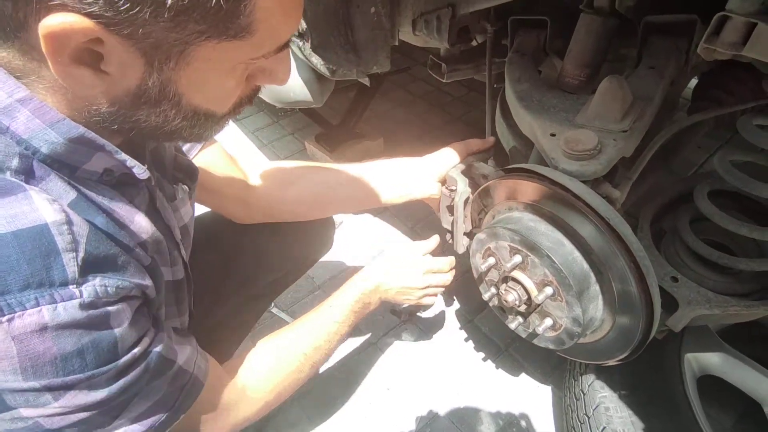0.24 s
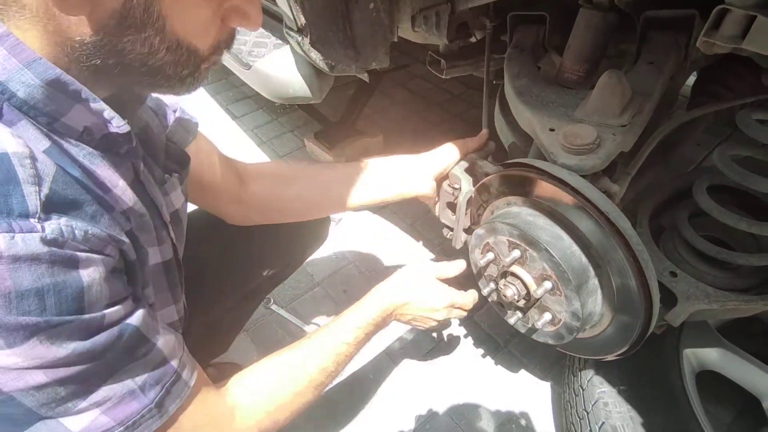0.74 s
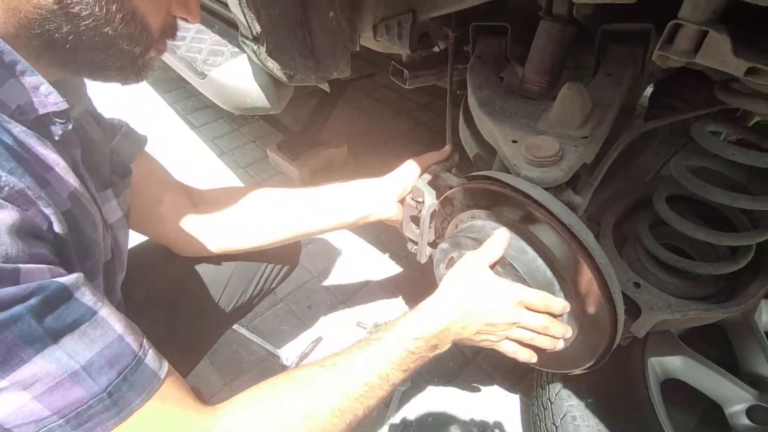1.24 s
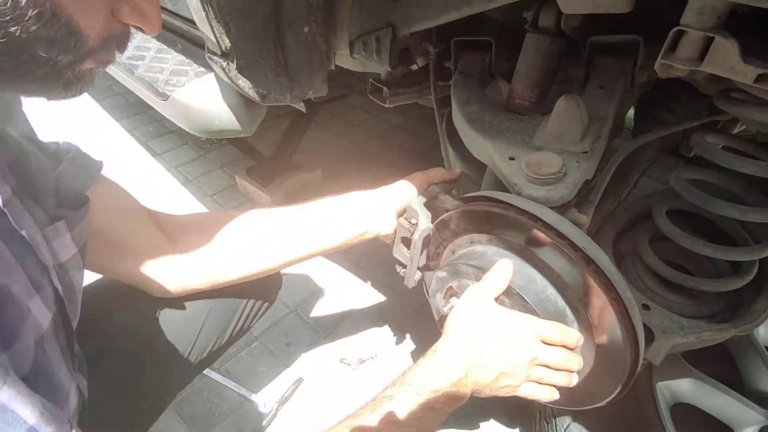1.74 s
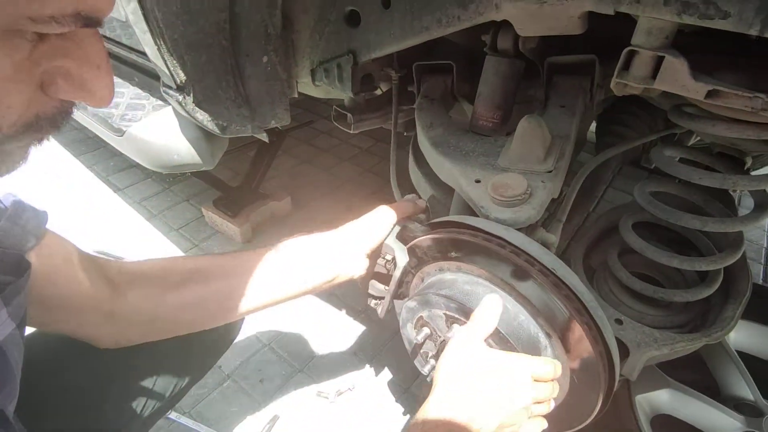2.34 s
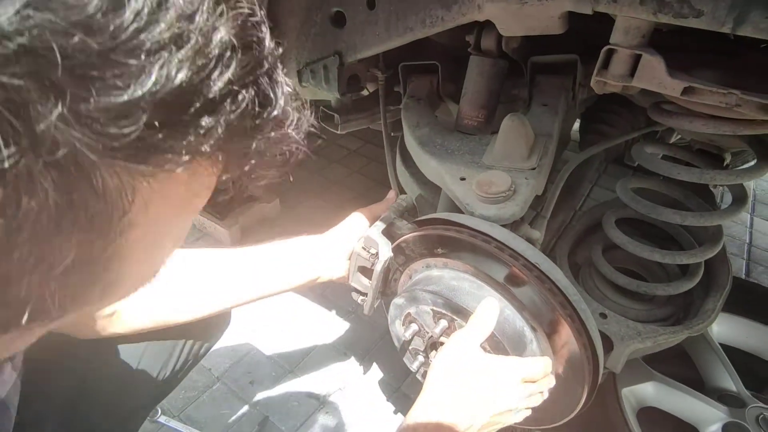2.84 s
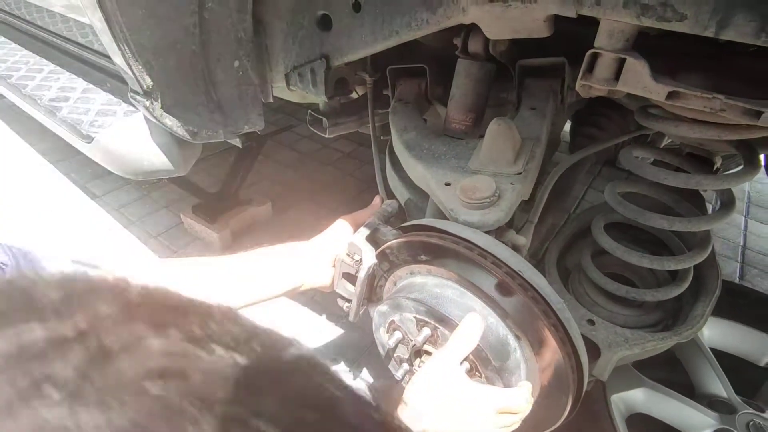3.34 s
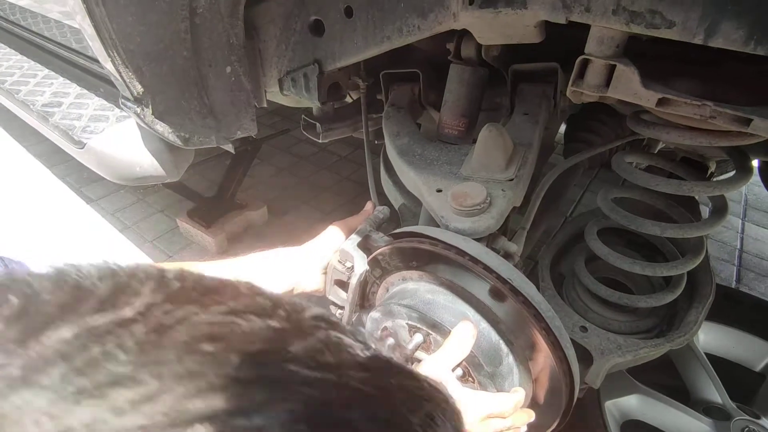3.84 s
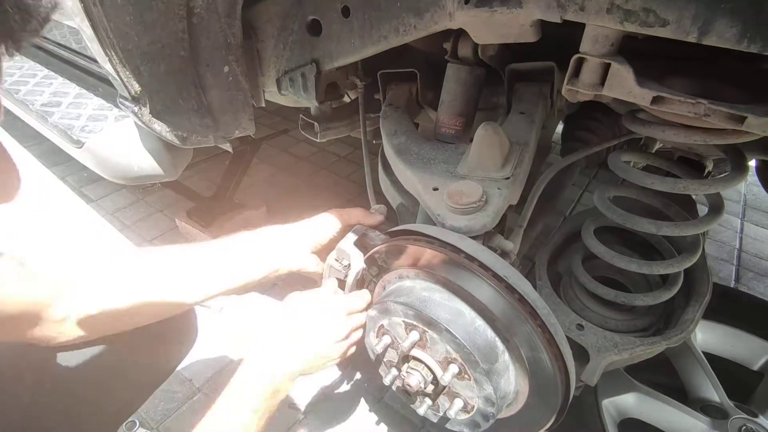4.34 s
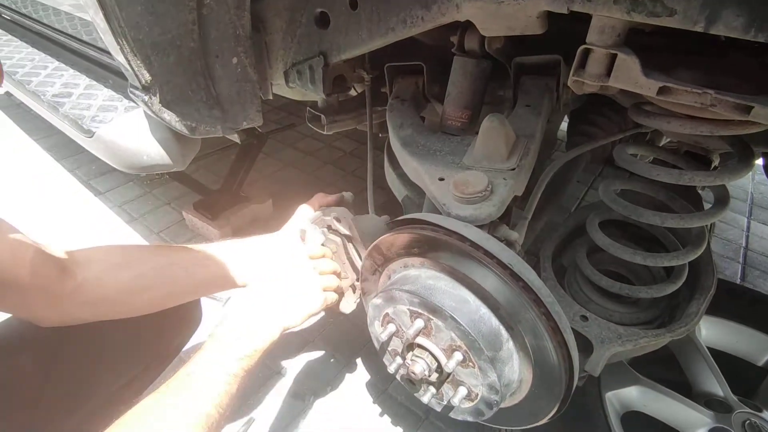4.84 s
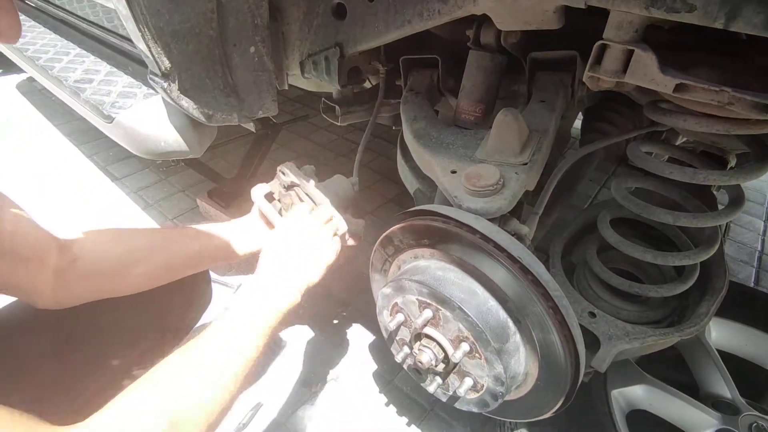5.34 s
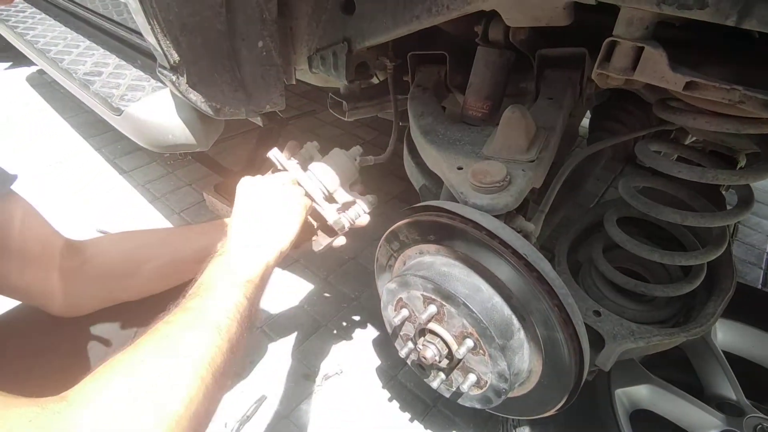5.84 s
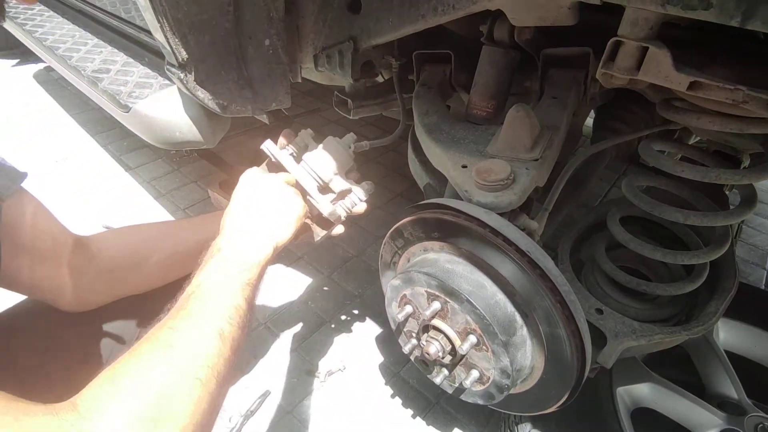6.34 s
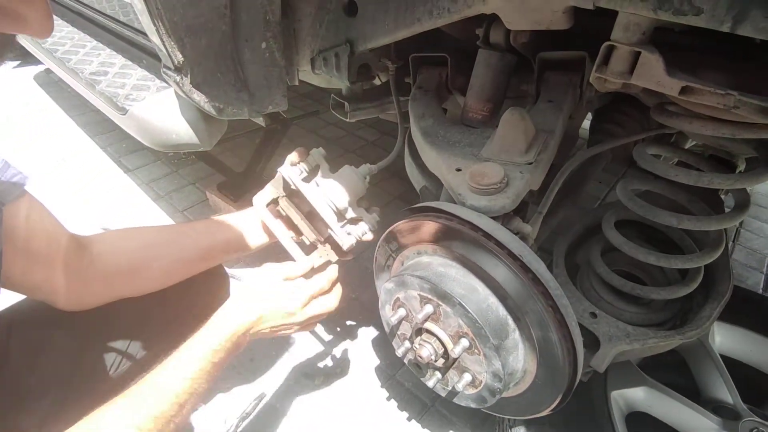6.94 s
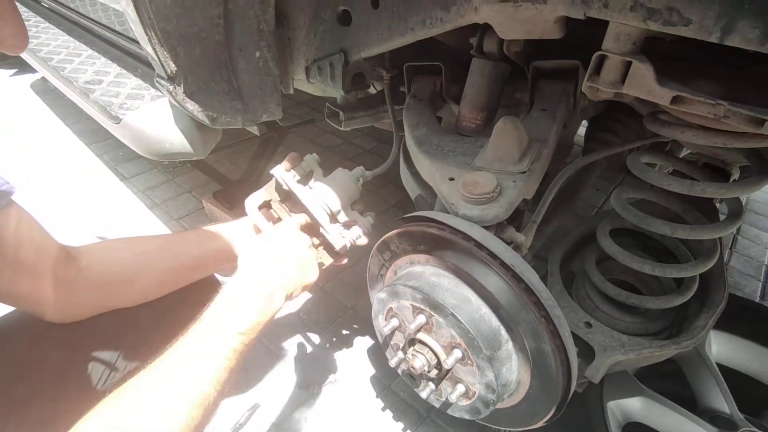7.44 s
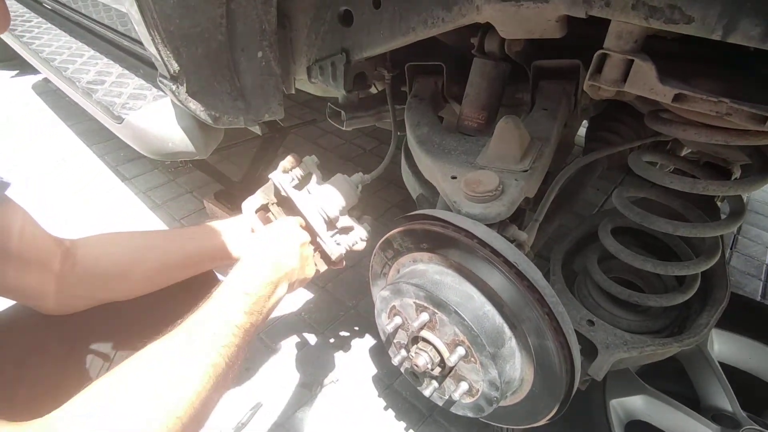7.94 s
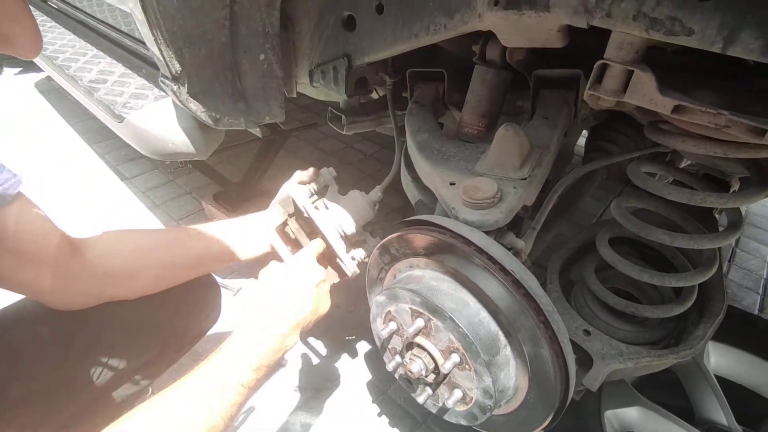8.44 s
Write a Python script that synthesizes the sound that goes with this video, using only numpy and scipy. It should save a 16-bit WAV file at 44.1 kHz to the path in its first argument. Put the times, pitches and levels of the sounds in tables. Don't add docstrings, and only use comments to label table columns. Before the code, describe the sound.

A loose brake caliper knocks and rattles against its iron disc, then is pulled off and lightly picked at, while wind buffets the microphone outdoors.

```python
import sys
import numpy as np
from scipy import signal
from scipy.fft import rfft, irfft, next_fast_len
from scipy.io import wavfile
from scipy.ndimage import uniform_filter1d, map_coordinates

SR = 44100
rng = np.random.default_rng(int(sys.argv[2]) if len(sys.argv) > 2 else 0)


def volts_from_db(level):
    exponent = np.asarray(level, float) / 20
    return 10 ** exponent


def transcribe(u):
    v = np.clip(np.atleast_2d(u).T, -1, 1)
    q = np.round(v * 32767).astype(np.int16)
    wavfile.write(sys.argv[1], SR, q)


N = 383714

STRONG_DB = -30


def unit(x):
    return x / np.sqrt(np.mean(x ** 2, axis=-1, keepdims=True) + 1e-20)


def curves(rows):
    s, *cols = np.transpose(rows)
    return [np.interp(np.arange(N) / SR, s, c) for c in cols]


def wobble(rate):
    knots = rng.standard_normal((2, int(N * rate / SR) + 4))
    return np.array([map_coordinates(k, [np.arange(N) * rate / SR]) for k in knots])


def along(points, hz):
    f, v = np.transpose(points)
    return np.interp(np.log(hz + 1), np.log(f), v)


def coloured(x, spectrum):
    m = 8192
    level_db = along(spectrum, np.fft.rfftfreq(m, 1 / SR))
    cepstrum = irfft(np.log(volts_from_db(level_db) + 1e-6), m)
    cepstrum[1:m // 2] *= 2
    cepstrum[m // 2 + 1:] = 0
    response = irfft(np.exp(rfft(cepstrum)), m)[:m // 2] * np.hanning(m)[m // 2:]
    return signal.fftconvolve(x, response[None] / np.linalg.norm(response), axes=1)[:, :N]


def noise(alike):
    a, b = rng.standard_normal((2, 2, N))
    share = np.clip(alike, 0, 1)
    return np.sqrt(share) * a[0] + np.sqrt(1 - share) * b


def brake():
    # Hz, level in dB per Hz
    thud_colour = [(110, -27), (200, 0.5), (500, -0.5), (900, -7), (1200, -10.5), (2000, -60.5),
                   (4000, -120)]
    clack_colour = [(700, -34.5), (1200, -8), (1600, -0.5), (2400, -6.5), (2800, -11), (4200, -25),
                    (8000, -120)]
    fizz_colour = [(2000, -19.5), (3500, -8.5), (5500, -6.5), (7000, -2.5), (8500, -5), (9800, -18),
                   (13500, -28.5), (15500, -45.5)]
    swish_colour = [(1800, -16), (3200, -11), (5000, -9.5), (7000, -2), (8500, -8), (9800, -22.5),
                    (13500, -29.5), (15500, -54.5)]
    # Hz, level in dB, t60 in seconds
    held_disc = [(502, -1.5, 0.24), (629, -7, 0.08), (728, -14, 0.24), (927, -3.5, 0.11), (984.6, -6, 0.32),
                 (1550, -9.5, 0.078), (1934, -8, 0.11)]
    # Hz, left minus right in dB
    left_lean = [(60, 11.5), (180, 7), (550, 4), (1650, 5), (4970, -3.5), (15000, 4)]

    thud, clack, fizz, ring = part_contacts()
    rub_fizz, rub_grind = strokes()
    grain = unit(volts_from_db(2.2 * wobble(150) + 1.3 * wobble(45)[0] + 1.1 * wobble(12)[0]))
    grind = rub_grind * grain
    thud = thud + volts_from_db(-3.0) * grind * noise(1.0)
    clack = clack + volts_from_db(-8.0) * grind * noise(0.14)
    swish = rub_fizz * grain * noise(0.11)

    hum = ringing(held_disc)
    hum = hum / np.linalg.norm(hum[0])
    ring = ring + volts_from_db(-5) * signal.fftconvolve(grind * noise(0.28), hum, axes=1)[:, :N]

    mix = coloured(thud, thud_colour) + coloured(clack, clack_colour)
    mix = mix + coloured(fizz, fizz_colour) + coloured(swish, swish_colour)
    m = next_fast_len(N)
    lean = volts_from_db(along(left_lean, np.fft.rfftfreq(m, 1 / SR)) * [[.5], [-.5]])
    return irfft(rfft(mix + ring + long_rings(), m) * lean, m)[:, :N]


def part_contacts():
    # time in seconds, peak in dB, then thud, fizz and ring
    # in dB re peak
    nudges = [(0.005, -56, 8, -10, 3.5), (0.1176, -43, 0.5, -6, -2), (0.2669, -41, -16, -4, -6.5),
              (0.385, -55, 1, 1, -4), (0.431, -33, -21, 6.5, -5), (0.4406, -39, -28.5, 7, -5),
              (0.7659, -43.5, 6.5, -35, -4.5), (0.853, -49.5, 5, -5.5, -22)]
    first_rock = [
        (1.4491, -17, -6.5, -8.5, 0.5),
        (1.4774, -29.5, 4.5, -2, -5),
    ]
    second_rock = [(1.669, -33, 1, -1.5, -13.5), (1.6972, -33, 5, -10.5, -8.5),
                   (1.7144, -27.5, -12, -15.5, -4), (1.7254, -20, 0.5, -10.5, -1),
                   (1.7414, -22, 2, -11, -1), (1.752, -24.5, 1, -17.5, -5), (1.884, -39.5, 12, -33, 11.5),
                   (1.9062, -33, 5.5, -8, 0.5)]
    third_rock = [(1.9546, -44.5, 12, -2, -3), (1.993, -29, 1.5, -18.5, -4.5),
                  (2.0064, -21.5, 1, -11.5, 0.5), (2.025, -40.5, 16.5, -41, 6),
                  (2.07, -45.5, 11, -18, -0.5)]
    fourth_rock = [(2.1232, -45.5, 16.5, -17, 7), (2.1382, -46, 10, -9, -1), (2.1563, -23.5, -5, 1, -10),
                   (2.165, -33.5, -5, -2.5, -22), (2.206, -21, -2.5, -14.5, -0.5)]
    last_rock = [
        (2.3896, -25, 1, -12.5, -3.5),
        (2.47, -48.5, 15.5, -3, 4),
        (2.5503, -50, 1, 3, -16),
        (2.6554, -53, -24, 7.5, -17),
    ]
    lead_in = [(3.6632, -46, 6.5, -8.5, 1.7), (3.6717, -42, 0.5, -11.5, 4), (3.6772, -39.5, 0, -4, 7.8),
               (3.692, -35.5, -2, -3, 2.5)]
    ticks = [(7.305, -63, 8, -3, -20), (7.645, -58, -13, 12, -22.5), (7.765, -64, -9.5, 5.5, -20),
             (8.095, -67, -8, 7, -19.5), (8.144, -45, -25, 12.5, 6.5), (8.158, -56.5, -0.5, 6, -5.5)]
    taps = [
        (1.719, -20.5, -19, -37.5, 3.5),
        (2.2862, -56.5, -15, 2, 15),
        (2.2993, -52.5, -34, 11, 17.5),
    ]
    knocks = [
        (3.7075, -35.5, -15, -3, 4.5),
        (3.7199, -18.5, -9.5, -11.5, -5.5),
    ]
    pulls = [(4.5844, -40, -1, -2, 1), (4.6042, -41, -0.5, -0.5, 7), (4.6274, -35, -7, -9, -2),
             (4.7192, -34, -22, -27, 2.5), (4.8147, -59.5, -10, -9, 12), (4.8494, -42.5, -15, -9, 0.5),
             (4.8666, -52, -6, -14, 11.5), (4.8968, -37, -11, -6.5, 5.5), (4.9144, -30, -6, -31.5, -6.5),
             (4.9374, -35.5, -13, -4.5, -37)]
    picks = [(4.4238, -41.5, -6.5, -2, -23), (5.7643, -46, -17, -1.5, -9.5), (5.912, -20, -21.5, -7.5, -2),
             (5.9394, -33.5, -23, 0.5, -20), (6.0265, -48, -22.5, 14.5, -20), (6.134, -60, -21, 4, -25),
             (6.2632, -43.5, -19, 0, -22), (7.659, -49.5, -9.5, 5, -21.5), (8.6844, -44.5, 3, -1, -21)]
    # Hz, level in dB, t60 in seconds
    caliper = [(1554, -15.5, 0.16), (1683, 3, 0.11), (1938, 5.5, 0.14), (2220, -5.5, 0.24),
               (7100, -10, 0.044), (8550, -16, 0.032)]
    grip_one = [(451, -6, .12), (749, -17, 0.32), (942, -1, 0.11), (981, -9, 0.14), (1380, -32, .6),
                (1520, 2, 0.044), (1629, -12, 0.13), (1895, -7, 0.13), (2185, -11.5, 0.073),
                (2912, -33, 0.12)]
    grip_two = [(366, -10, 0.11), (477.5, 0.5, 0.12), (644.7, -6, 0.23), (693, -6.5, .15),
                (868, -4.5, 0.24), (1082, -2, .077), (1394, -16.5, .5), (1510, -9.5, 0.062),
                (1642, -15, .12), (1940, -16, .15)]
    grip_three = [(642, 2, 0.083), (770, -9, 0.29), (950, -3, 0.17), (1072, -4.5, 0.1), (1302, -8.5, 0.13),
                  (1440, -12, 0.11), (1503, -16, 0.15), (1660, -20, 0.27), (1940, -25, 0.18),
                  (2240, -33, 0.25), (2420, -21, 0.089), (3208, -38, 0.18)]
    grip_four = [(344, -6.5, 0.1), (529, 1.5, 0.077), (782, -17.5, 0.31), (917, -7.5, 0.35),
                 (1035, 2, 0.09), (1348, -10.5, 0.15), (1705, 1.5, 0.049), (1823, -11, 0.072),
                 (1880, -8, 0.12), (2568, -38, .15), (2980, -18.5, .1)]
    grip_five = [(489, 4, 0.11), (785, -5.5, 0.25), (838, -8.5, 0.21), (990, -6.5, .1), (1320, -10.5, 0.21),
                 (1510, -1.5, 0.14), (1720, -11, 0.096), (2300, -29, 0.4), (2880, -8, 0.073),
                 (3500, -14, .09)]
    pad_edge = [(510, -0.5, 0.09), (1020, -36, 0.036), (1515, 3, 0.064), (2253, -3, .07),
                (3380, -14, 0.093)]
    spring = [(2130, -8, 0.074), (2860, -9, 0.025), (4300, -16, 0.027), (7000, 18.5, 0.034),
              (9450, -13.5, .02)]
    shield = [(2290, -1, 0.22), (2160, -10, .12), (2355, -4, 0.27), (2751, -20, .1)]
    free_disc = [(503, -26, .45), (732, -30, 0.66), (872, -11.5, 0.49), (1023, -9, 0.36), (1482, 5.5, 0.14),
                 (1764, -10, 0.17), (1820, -18, 0.5), (2300, -25.5, 0.7), (2390, -29, 0.73),
                 (2493, -24.5, 0.39), (1860, -23, .28), (6760, -23, 0.19)]
    bracket = [(521, -1.5, 0.055), (951, -12, 0.3), (1490, -5.5, 0.12), (1913, -2.5, 0.3), (2210, -22, 0.2),
               (4360, -32, 0.18), (5770, -30, 0.3), (3065, -26, 0.47), (7205, -32, 0.26)]
    clip = [(1499, -14, 0.17), (2220, -25, 0.0082), (2770, -16.5, 0.1), (3430, 9, 0.02), (4600, -25, 0.034),
            (5550, 3, 0.013), (6010, 2, 0.029), (7340, -6, 0.057), (8550, -13, 0.073)]

    parts = [  # events, modes, rattle t60 in seconds
        (nudges, caliper, .15),
        (first_rock, grip_one, .08),
        (second_rock, grip_two, .09),
        (third_rock, grip_three, .09),
        (fourth_rock, grip_four, .09),
        (last_rock, grip_five, .09),
        (lead_in, pad_edge, .12),
        (ticks, spring, .05),
        (taps, shield, .12),
        (knocks, free_disc, .12),
        (pulls, bracket, .09),
        (picks, clip, .06),
    ]
    return sum(contacts(*part) for part in parts)


def contacts(events, modes, rattle_s):
    rattle_grows = 0.3
    t = np.arange(SR // 4) / SR
    bursts = np.zeros((4, 2, N + SR))
    for s, db, thud_db, fizz_db, ring_db in events:
        rattle = rattle_s * volts_from_db(rattle_grows * thud_db)
        shape = volts_from_db(-60 * t / rattle) + 0.098 * volts_from_db(-60 * t / 0.22)
        shape = shape * (1 - np.exp(-t / 0.00067))
        grit = volts_from_db(1.97 * np.repeat(rng.standard_normal(len(t) // 40 + 1), 40)[:len(t)])

        common = rng.standard_normal((4, 1, len(t)))
        own = rng.standard_normal((4, 2, len(t)))
        later = np.roll(common, rng.integers(-8, 14), axis=2)
        both = np.concatenate([common, later], axis=1)
        rattles = shape * grit * (0.6 * both + 0.36 * own)

        spot = rng.standard_normal((3, 1, 900)) * volts_from_db(-60 * t[:900] / 0.018)
        spot[..., 0] += 5.5
        spot = spot / np.linalg.norm(spot, axis=2, keepdims=True)
        rattles[:3] = signal.fftconvolve(rattles[:3], spot, axes=2)[..., :len(t)]

        rattles[3] *= 0.5 / np.linalg.norm(rattles[3, 0])
        rattles[3, :, 30] += .7
        levels = volts_from_db(db + np.array([thud_db, -5, fizz_db + 1.5, ring_db - 0.5]))
        start = round(s * SR)
        bursts[:, :, start:start + len(t)] += levels[:, None, None] * rattles

    span = slice(round(events[0][0] * SR), round(events[-1][0] * SR) + SR)
    rung = signal.fftconvolve(bursts[3, :, span], ringing(modes), axes=1)
    bursts[3, :, span] = rung[:, :span.stop - span.start]
    return bursts[..., :N]


def ringing(modes):
    hz, level, t60 = np.transpose(modes)[:, :, None]
    t = np.arange(SR) / SR
    lead = rng.normal(0, [[[2]], [[.7]]], (2, len(hz), 1)).cumsum(axis=0)
    twin = hz * (1 + rng.normal(0, 0.013, hz.shape))
    pair = np.sin(2 * np.pi * hz * t + lead)
    pair = pair + 0.49 * volts_from_db(-60 * t / t60) * np.sin(2 * np.pi * twin * t + lead)
    return (volts_from_db(level - 60 * t / t60) * pair).sum(axis=1) * (1 - np.exp(-t / 0.0018))


def long_rings():
    # start in seconds, Hz, level in dB, t60 in seconds
    free_modes = [(1.719, 2751, -27, .1), (3.722, 1384, -47, 1.6), (3.722, 1364, -47, .7),
                  (4.719, 1911, -40, .16), (4.719, 1545, -42, .1), (4.915, 940, -56, .2),
                  (4.94, 940, -35.5, .4), (5.912, 3560, -24, .07), (8.687, 1900, -42, .1)]
    out = np.zeros((2, N + SR))
    for s, hz, db, t60 in free_modes:
        start = round(s * SR)
        out[:, start:start + SR] += ringing([(hz, db, t60)])
    return out[:, :N]


def strokes():
    # time in seconds, level in dB
    rub = [(0, -65), (1.4, -61.5), (1.7, -58), (2.6, -70), (3.15, -67.5), (5.3, -64.5), (6.5, -77),
           (8.7, -69)]
    # start in seconds,
    # length in seconds, fizz in dB, grind in dB
    slides = [(0, 0.034, -57, -49.5), (0.098, 0.1, -59.5, -52), (0.242, 0.079, -57.5, -50),
              (0.41, .18, -50, -47.5), (1.408, 0.24, -68, -50), (1.655, 0.22, -52.5, -38.5),
              (1.811, 0.039, -37.5, -58), (1.832, 0.053, -30, -43.5), (1.858, 0.054, -42.5, -41.5),
              (1.882, 0.23, -70, -49), (1.979, 0.013, -49.5, -62), (2.11, 0.21, -60, -41),
              (2.113, 0.032, -54, -61), (2.235, 0.088, -58.5, -50), (2.351, 0.22, -59, -48.5),
              (2.351, 0.045, -53.5, -65), (2.572, 0.33, -59, -62), (2.91, 0.16, -55, -78),
              (3.204, 0.31, -54, -74), (3.642, 0.18, -66, -44.5), (3.926, 0.18, -56.5, -61.5),
              (4.185, 0.087, -60, -67.5), (4.57, 0.081, -47.5, -52), (4.634, 0.2, -71, -58),
              (4.814, 0.27, -65.5, -62.5), (5.046, 0.29, -57.5, -93), (6.007, 0.036, -53.5, -75),
              (6.198, 0.095, -64, -77), (6.674, 0.2, -89, -65), (7.278, 0.38, -65.5, -86),
              (8.25, 0.19, -60.5, -85)]
    gains = np.zeros((2, N))
    gains[0] = volts_from_db(curves(rub)[0] - 5.0)
    for s, length, fizz_db, grind_db in slides:
        whole = 1.35 * length * SR
        u = np.arange(int(whole)) / whole
        swell = np.sin(np.pi * u ** .6) ** 1.6
        start = round(s * SR)
        gains[:, start:start + len(u)] += volts_from_db([[fizz_db + 0.5], [grind_db + 2.5]]) * swell
    return gains


def drag():
    # time in seconds, level in dB
    drag_level = [(4.581, -92), (4.586, -43), (4.64, -64), (4.7, -63), (4.84, -67), (4.855, -61),
                  (4.9, -50), (4.93, -62), (4.95, -88.5)]
    # Hz, level in dB, t60 in seconds
    high_modes = [(3070, -5.5, 0.1), (4350, -13.5, .1), (5030, -17.5, .15), (5770, -7, .16),
                  (7050, -4, 0.19), (7200, 0, .18), (7575, -9, 0.11), (8680, -9.5, .15)]
    slips = volts_from_db(curves(drag_level)[0]) * unit(volts_from_db(4 * wobble(120)[0]) * noise(.7))
    sing = ringing(high_modes)
    return signal.fftconvolve(slips, sing / np.linalg.norm(sing[0]), axes=1)[:, :N]


def wind():
    # time in seconds, level in dB
    lee = [(0, -51), (3.1, -54), (3.5, -57), (6.1, -59), (6.8, -44.5), (7.05, -48.5), (7.3, -35.5),
           (8.15, -63.5), (8.425, -45), (8.46, -25.5), (8.7, -55)]
    # Hz, level in dB per Hz
    rumble_colour = [(10, -20.5), (22, 5), (40, 1), (90, -2), (130, -12.5), (200, -59), (500, -120)]
    flutter_colour = [(60, -37.5), (110, 0), (170, 4), (250, -9), (350, -23), (550, -44), (1500, -120)]
    spit_colour = [(120, -36.5), (260, 9.5), (400, -2.5), (600, -15.5), (1000, -56), (2500, -120)]

    left_db = gusts() - lulls()
    right_db = curves(lee)[0] - lulls() + 0.5 * wobble(4.9)[0]
    left_flutter_db = -31.5 + 1.67 * (left_db - STRONG_DB)
    rumble_db = np.array([left_db, right_db])
    flutter_db = np.array([left_flutter_db, 1.17 * right_db + 9.5])

    lumps, spikes = wobble(14), wobble(40)
    rumble = unit(volts_from_db(2.8 * lumps) * coloured(noise(0), rumble_colour)) * volts_from_db(rumble_db)
    flutter = unit(volts_from_db(4.4 * lumps + 4 * spikes) * coloured(noise(0), flutter_colour)) * volts_from_db(flutter_db)
    spit = unit(volts_from_db(4.5 * lumps + 5.5 * spikes) * coloured(noise(0), spit_colour))
    out = rumble + flutter + spit * volts_from_db(1.3 * flutter_db - 3.0)
    out[0] = eddies(out[0])
    return out


def gusts():
    # start in seconds, hold in seconds, level in dB
    gust_rows = [(0, 0.048, -24.5), (0.262, 0.79, -26.5), (0.694, 0.071, -31.5), (1.11, 0.039, -31.5),
                 (1.295, 0.047, -34), (1.738, 0.2, -33.5), (2.07, 0.62, -33), (2.514, 0.0099, -28.5),
                 (2.6, 0.16, -34), (2.929, 0.07, -30.5), (3.121, 0.14, -40), (3.493, 0.19, -34),
                 (3.884, 0.33, -34.5), (4.217, 0.17, -41), (4.55, 0.094, -31), (4.818, 0.073, -36.5),
                 (5.113, 0.089, -32.5), (5.613, 0.0078, -32), (5.697, 0.028, -36), (5.859, 0.0077, -34.5),
                 (5.958, .12, -38.5), (6.117, 0.21, -30), (6.614, 0.062, -32.5), (6.951, 0.085, -28.5),
                 (7.309, 0.14, -32), (7.591, 0.089, -27), (7.834, 0.015, -28.5), (7.976, 0.031, -40.5),
                 (8.102, 0.44, -31.5), (8.464, 0.21, -29.5)]
    rise, sag, fall = 353, 11, 145.5
    calm_db = -43
    t = np.arange(0, N / SR + .01, .004)
    s, hold, db = np.transpose(gust_rows)[:, :, None]
    each = db - rise * np.maximum(s - t, 0)
    each = each - sag * np.clip(t - s, 0, hold)
    each = each - fall * np.maximum(t - s - hold, 0)
    total = 10 * np.log10((volts_from_db(each) ** 2).sum(axis=0) + volts_from_db(calm_db) ** 2)
    return np.interp(np.arange(N) / SR, t, total)


def lulls():
    # time in seconds, half width in seconds, depth in dB
    still_air = [
        (0.204, .03, 2.5),
        (.93, 0.067, 2),
        (3.42, 0.043, 8.5),
        (5.45, 0.079, 5.5),
    ]
    t = np.arange(N) / SR
    return sum(db * np.exp(-((t - s) / width) ** 2) for s, width, db in still_air)


def eddies(port):
    # time in seconds, peak in dB
    pops = [(0.022, -21.5), (0.048, -23), (0.252, -22), (0.351, -12), (0.39, -22.5), (0.647, -25),
            (0.695, -28.5), (1.112, -26), (2.754, -29.5), (2.934, -21), (3.237, -36), (3.505, -30.5),
            (3.576, -29), (4.029, -35), (4.067, -33), (4.823, -33), (5.094, -28.5), (5.61, -33.5),
            (5.84, -27), (6.236, -27), (6.624, -28), (6.937, -28.5), (7.039, -36.5), (7.349, -20.5),
            (7.375, -23), (7.591, -34), (7.658, -21.5), (7.832, -26.5), (8.119, -27), (8.188, -28.5),
            (8.246, -24.5), (8.463, -20)]
    t = np.arange(-800, 1600) / SR
    for (s, db), turn in zip(pops, rng.uniform(0, 2 * np.pi, len(pops))):
        hz = 171.4 + 5 * (db - STRONG_DB)
        swell = np.where(t < 0, np.exp(-(t * hz / 0.26) ** 2), 1 / (1 + (t * hz / 0.86) ** 2))
        start = max(round((s + 0.00361) * SR) - 800, 0)
        port[start:start + len(t)] += volts_from_db(db + 6.5) * swell * np.cos(2 * np.pi * hz * t + turn)
    return port


def sparrows():
    # seconds from the start, Hz, level in dB
    chirrup = [(0, 3400, -6), (.014, 4000, -1), (.028, 4250, 3), (.037, 3330, -4), (.072, 3200, 3),
               (.09, 3650, 4), (.097, 2900, 0), (.125, 3430, -11), (.14, 2900, -42)]
    cheep = [(0, 3900, -38), (.008, 4340, -6.5), (.024, 5080, -0.5), (.045, 4800, -8), (.072, 3850, -18),
             (.105, 3500, -23), (.112, 3750, -2.5), (.14, 4710, -8.5), (.17, 4600, -14)]
    # start in seconds, level in dB, pitch factor
    chirrups = [
        (0.466, -50.5, 1.016),
        (2.94, -53.5, .9),
        (5.215, -50, .99),
        (8.304, -56, 1.013),
    ]
    cheeps = [
        (0.197, -56.5, 0.96),
        (7.351, -50.5, 0.97),
    ]
    out = np.zeros((2, N + SR))
    t = np.arange(SR // 2) / SR
    for shape, calls, upper in [(chirrup, chirrups, .4), (cheep, cheeps, .8)]:
        u, hz, db = np.transpose(shape)
        for s, level_db, tune in calls:
            husk = uniform_filter1d(rng.standard_normal((2, len(t))), size=70)
            husk = unit(uniform_filter1d(husk, size=50))
            glide = tune * hz * rng.normal(1, .015, len(u))
            pitch = np.interp(t, u, glide) * (1 + .022 * husk[0])
            phase = 2 * np.pi * np.cumsum(pitch) / SR
            voice = np.sin(phase) + upper * np.sin(1.17 * phase)
            loudness = volts_from_db(level_db + np.interp(t, u, db, right=-200) - 1.0 + 4.5 * husk[1])
            call = loudness * voice * np.minimum(t / 0.0037, 1)
            start = round(s * SR)
            out[:, start:start + len(t)] += walls(call, t60=0.32, wet_db=1.5)
    return out[:, :N]


def dove():
    # start in seconds, length in seconds, Hz, level in dB
    coos = [(1.339, .2, 577, -60), (2.78, .08, 550, -66), (3.02, .06, 480, -62), (6.33, .026, 452, -56),
            (6.365, .025, 520, -56), (7.72, .05, 581, -64), (7.785, .06, 581, -64), (7.919, .089, 580, -62),
            (8.56, .04, 620, -71), (8.59, .05, 930, -69), (8.63, .05, 640, -70), (7.74, .1, 385, -68),
            (7.92, .09, 388, -67)]
    x = np.zeros(N + SR)
    for s, length, hz, db in coos:
        t = np.arange(int(length * SR)) / SR
        swell = np.sin(np.pi * t / length) ** .5
        x[round(s * SR):][:len(t)] += volts_from_db(db) * swell * np.sin(2 * np.pi * hz * t)
    return walls(x[:N], t60=0.11, wet_db=9.0)


def walls(x, t60, wet_db):
    t = np.arange(SR // 2) / SR
    tail = rng.standard_normal((2, len(t))) * volts_from_db(-60 * t / t60)
    tail = tail / np.linalg.norm(tail[0])
    return x + volts_from_db(wet_db) * signal.fftconvolve(x[None], tail, axes=1)[:, :x.size]


def yard():
    # Hz, level in dB per Hz
    yard_colour = [(100, -11.5), (300, -21.5), (600, -17), (1000, -26), (4500, -37.5), (7500, -45),
                   (9300, -44.5), (12500, -52.5), (13500, -89)]
    return volts_from_db(-62.5 + 1.2 * wobble(2)) * coloured(noise(0.019), yard_colour)


def scene():
    return brake() + drag() + wind() + sparrows() + dove() + yard()


def roll_off(x):
    return signal.sosfilt(signal.butter(12, 15150, fs=SR, output="sos"), x)


def record(dry):
    held = dry / (1 + np.abs(dry / .56) ** 4) ** (1 / 4)
    return roll_off(held)


dry = scene()
out = record(dry)
transcribe(out)
```